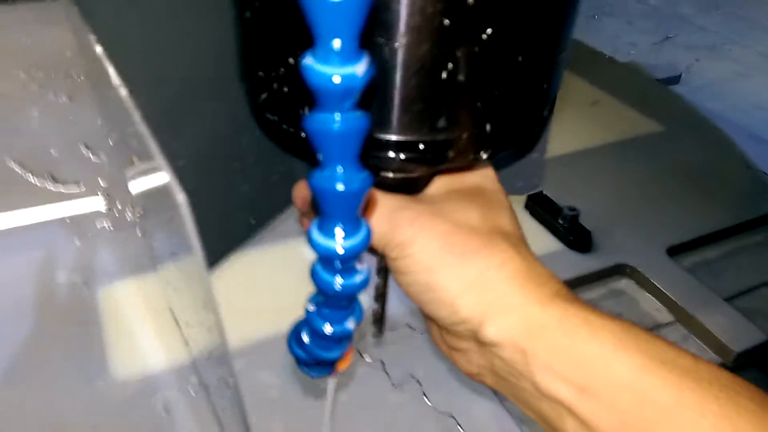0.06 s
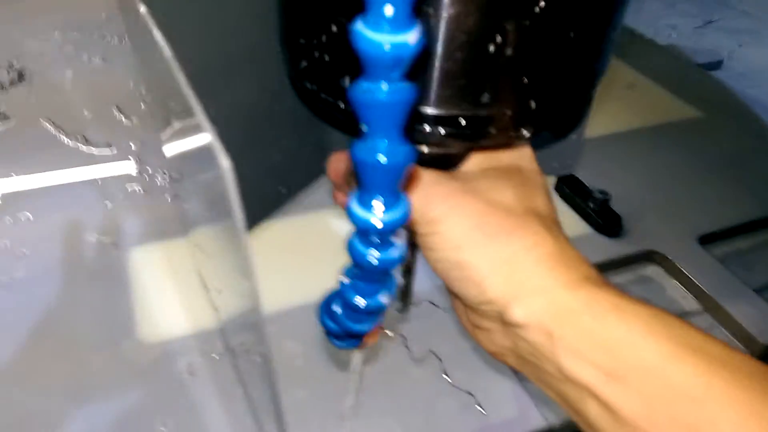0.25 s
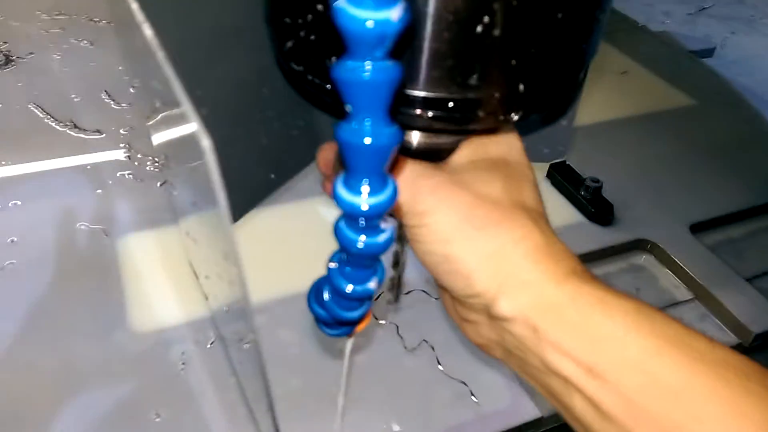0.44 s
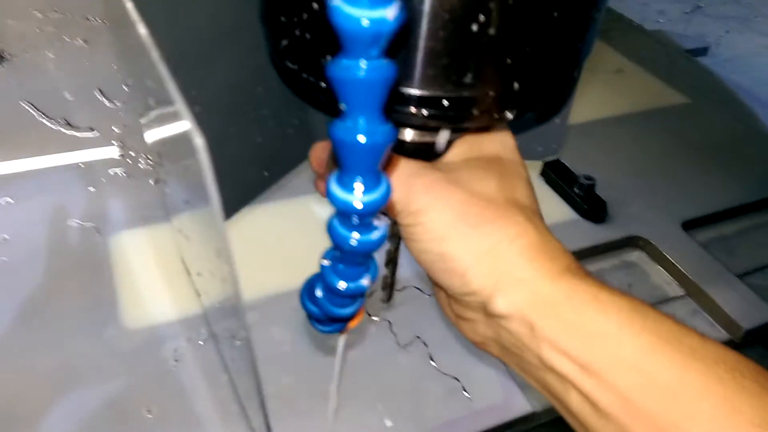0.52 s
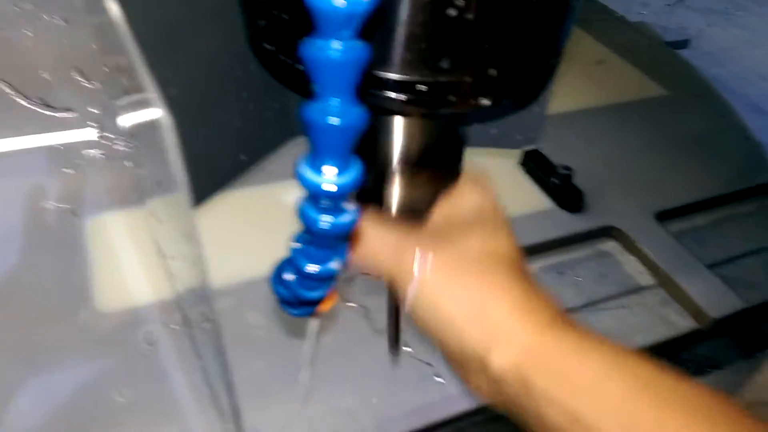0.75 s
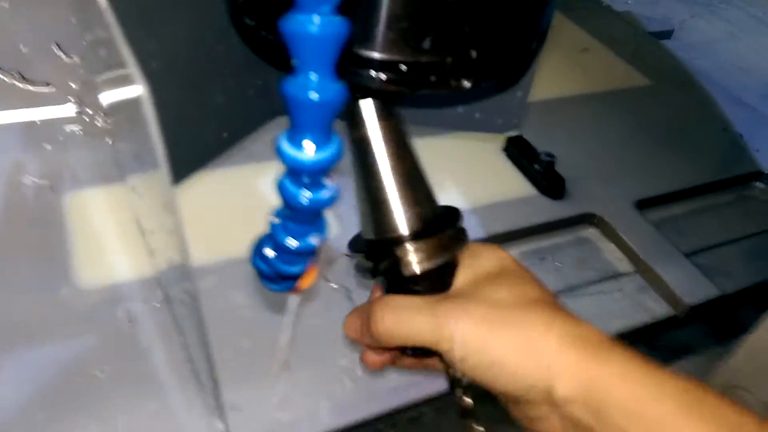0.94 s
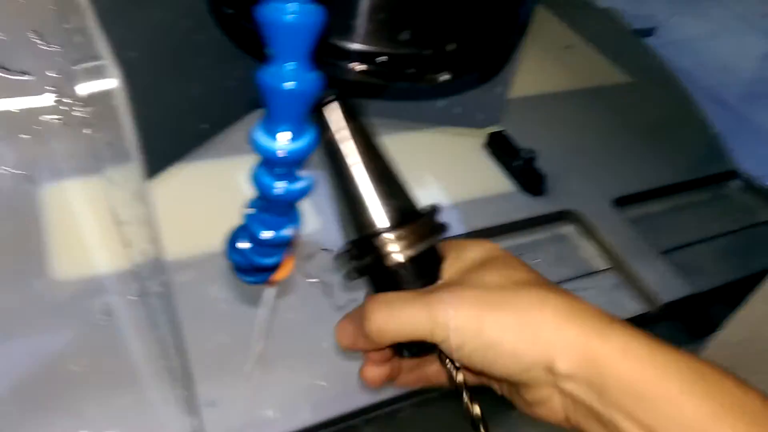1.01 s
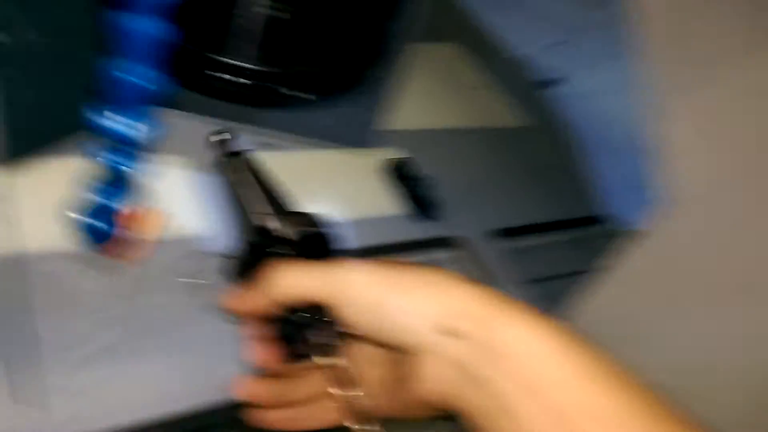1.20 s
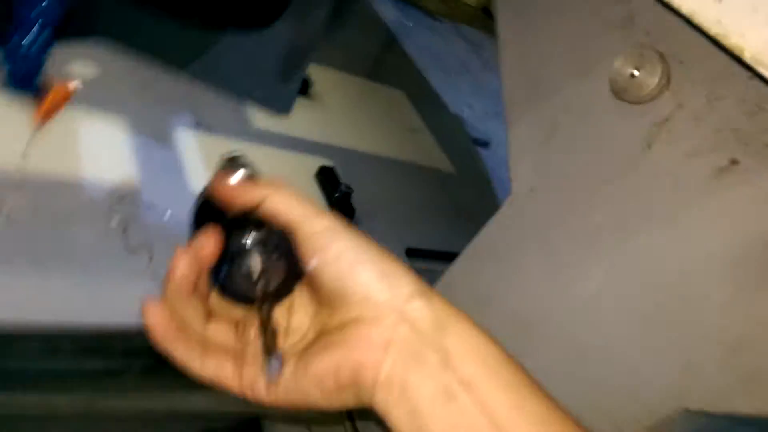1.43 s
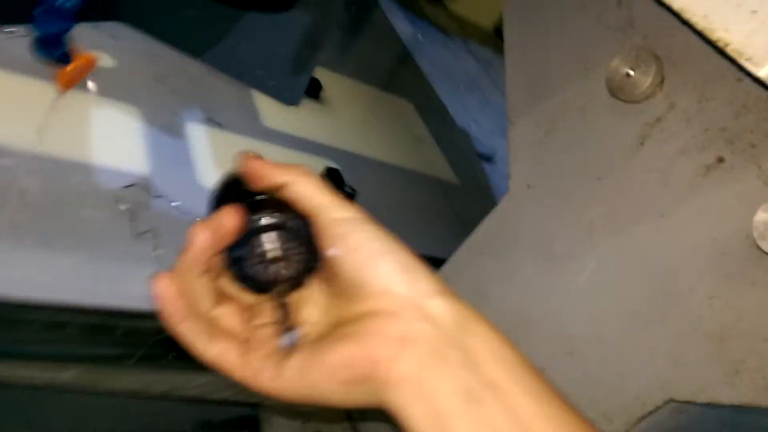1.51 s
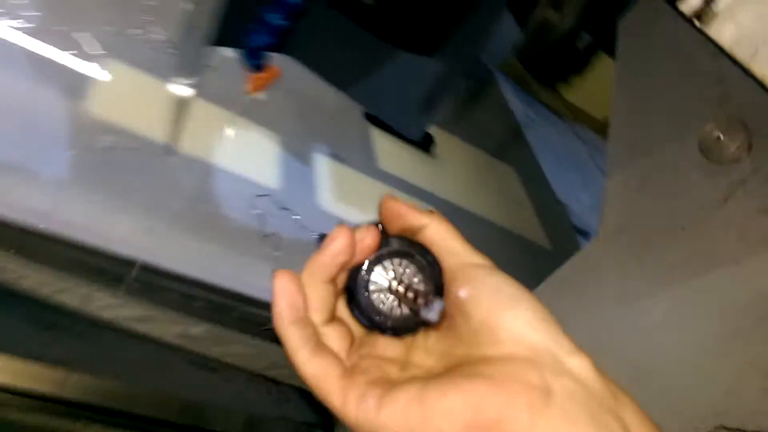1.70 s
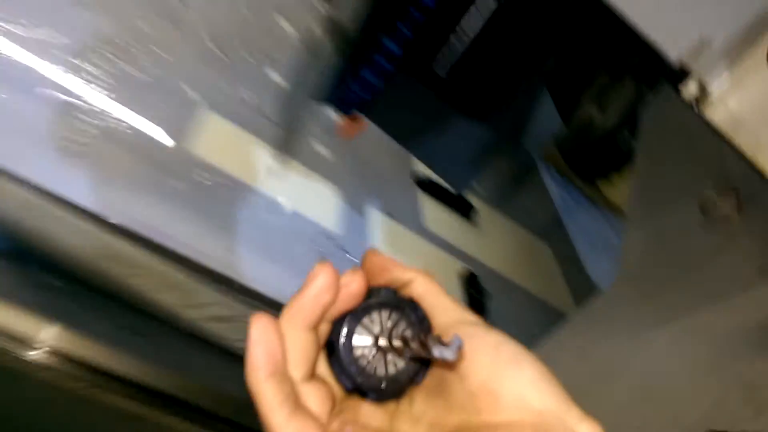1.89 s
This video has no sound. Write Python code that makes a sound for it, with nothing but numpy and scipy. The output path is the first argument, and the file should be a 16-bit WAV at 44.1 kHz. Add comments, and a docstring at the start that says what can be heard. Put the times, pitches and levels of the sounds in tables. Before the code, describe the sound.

A hiss of compressed air and metal clunks as a machine spindle releases a tool holder.

```python
"""A tool holder is released by hand from a milling spindle inside a sheet-metal enclosure.
A valve ticks, then the drawbar clunks, exciting the modes of the machine's body and panels.
Air spits and leaks past the loosening taper, then blows through the open bore, whose lowest
resonance rises as the holder is drawn out. The drawbar thumps back and the air dies away.
Last, the holder squeaks faintly in the hand while the machine hums on."""
import sys
import numpy as np
from scipy import signal
from scipy.fft import rfft, irfft
from scipy.io import wavfile

SR = 44100
rng = np.random.default_rng(int(sys.argv[2]) if len(sys.argv) > 2 else 0)


def generate_wav(signal):
    """Clip the signal to [-1, 1] and save it as 16-bit WAV at the path in sys.argv[1]."""
    frames = np.transpose(np.atleast_2d(signal))
    scaled = np.clip(frames, -1, 1) * 32767
    pcm = np.round(scaled).astype(np.int16)
    wavfile.write(sys.argv[1], SR, pcm)


N = 85995
T = np.arange(N) / SR
HZ = np.maximum(np.arange(N // 2 + 1) * SR / N, 1)
CUTOFF_HZ = 15900
AIR_PAN_DB, FLUTTER_DB, FLUTTER_HZ = 3, .8, 60
EAR_PHASE_RAD = 1.92  # phase lag of a resonance between the ears

# Air flow through the bore. Each row: time in seconds, level in dB.
FLOW = [(0.66, -43), (0.745, -38), (0.772, -31), (0.781, -16), (0.84, -16.5), (1.048, -15.5), (1.066, -22),
        (1.094, -23), (1.102, -32), (1.22, -52)]


def knocks():
    """Impact excitation: drawbar and holder give a clack of steel and set body and panels ringing."""
    # Each row: start in seconds, thud, clonk and clack levels in dB, clack cutoff in Hz,
    # favoured panel frequency in Hz.
    impacts = [(0.196, -24.5, -26, -16.5, 1570, 448), (0.262, -37, -32, -18, 2580, 2350),
               (0.268, -38, -27, -20.5, 1480, 600), (0.387, -23, -11.5, -14, 1940, 340),
               (0.448, -54, -49, -15, 2000, 1850), (0.466, -11, -16, -10, 1780, 720),
               (0.489, -32, -26, -19.5, 2840, 1500), (0.521, -30, -17, -8, 2030, 730),
               (0.539, -32, -43, -16, 3130, 756), (0.556, -27.5, -33, -17.5, 860, 716),
               (0.606, -57, -43, -16.5, 890, 870), (1.046, -8.5, -5, -11, 670, 306),
               (1.150, -27, -22.5, -14.5, 1340, 536), (1.230, -39.5, -50, -20, 2420, 1110)]
    # Low and middle modes of the body. Each row: frequency in Hz, relative level in dB, T60 in seconds.
    thud_modes = [(89.6, -3.5, 0.11), (128.1, -4.5, 0.26), (131, -1, 0.024)]
    clonk_modes = [(207, -11.5, 0.15), (298.8, 2, 0.065), (332.5, 4.5, 0.041), (313.2, -17, 0.33)]
    # Spectrum of the clack. Each row: frequency in Hz, relative level in dB.
    clack_colour = [(150, -3.5), (1300, -3), (1900, -7), (2400, 0), (6000, -8.5), (16000, -31)]
    ripple_db, bypass_db, panel_db = 2.5, -23, -8.5
    out = np.zeros((2, N))
    for start, thud_db, clonk_db, clack_db, top_hz, centre_hz in impacts:
        steel = noise(clack_colour) * burst(start, rise=.001, hold=.006, t60=.06)
        lowpass = signal.cheby1(4, ripple_db, top_hz, fs=SR, output="sos")
        clack = signal.sosfilt(lowpass, steel + 1e-18) + from_db(bypass_db) * steel
        metal = clack + from_db(panel_db) * panel_ring(start, centre_hz)
        body = from_db(thud_db) * ring(start, thud_modes) + from_db(clonk_db) * ring(start, clonk_modes)
        out += from_db(clack_db) * metal * pan(db=1.5) + body * pan(db=-4.5)
    return out


def panel_ring(start, centre_hz, db_per_octave=31.5):
    """Selective excitation: a panel mode rings less the farther it lies from the favoured frequency."""
    # Sheet-metal modes. Each row: frequency in Hz, relative level in dB, T60 in seconds.
    panel_modes = [(452.3, -4.5, 0.45), (554.4, 1.5, 0.13), (662, -4, 0.25), (878, 4, 0.05),
                   (1102, 2, 0.11), (1276, -0.5, 0.08), (1900, 2.5, 0.058), (2225, -3, 0.097),
                   (2394, 3, 0.042)]
    excited = [(hz, db - db_per_octave * abs(np.log2(hz / centre_hz)), t60)
               for hz, db, t60 in panel_modes]
    return ring(start, excited)


def bore_air():
    """Cavity resonance: a turbulent jet drives the bore, whose modes shift as the holder comes out."""
    # Lowest resonance, rising as the gap opens. Each row: time in seconds, frequency in Hz, level in dB.
    gap_tone = [(0.70, 740, -7), (0.754, 790, 6.5), (0.795, 850, -11), (0.92, 1130, -9.5)]
    # Upper resonances. Each row: frequency and width in Hz, then level in dB at each withdrawal stage.
    bore_modes = [(2146, 80, -13, -4, -3), (2630, 80, -1.5, -11, -3.5), (3730, 100, -5, -1, -1.5),
                  (6390, 350, -12, -15, -8), (10800, 650, -8, -8, -7), (12800, 330, -15, -12, -17)]
    # Withdrawal stages: the times in seconds at which the holder is just loose, half out and clear.
    stages_s = [.81, .91, 0.94]
    # Spectrum of the jet. Each row: frequency in Hz, relative level in dB.
    jet_colour = [(200, -79), (700, -7.5), (1600, -16), (2200, -2.5), (3000, 6), (4200, -2.5), (5300, -30),
                  (6200, -5), (7900, -5), (10000, 3.5), (11600, -4), (13500, -7.5), (16000, -9)]
    times, gap_hz, gap_db = np.transpose(gap_tone)
    lowest = resonance(np.interp(T, times, gap_hz), width_hz=105, ear_phase=EAR_PHASE_RAD)
    tones = from_db(np.interp(T, times, gap_db)) * lowest
    sag = np.interp(T, stages_s, [1.014, 1, .986])  # the upper resonances fall slightly
    swell_db, wander_share, wander_hz = 1.2, .008, 18  # turbulence unsettles level and pitch
    for hz, width_hz, *stage_db in bore_modes:
        db = np.interp(T, stages_s, stage_db) + swell_db * drift(wander_hz)
        centre_hz = hz * sag * (1 + wander_share * drift(wander_hz))
        tones += from_db(db) * resonance(centre_hz, width_hz, EAR_PHASE_RAD)
    air = eddies(noise(jet_colour)) * pan(AIR_PAN_DB) + tones * pan(db=6)
    return air * level(FLOW) * from_db(FLUTTER_DB * drift(FLUTTER_HZ))


def eddies(jet, count=20, depth_db=2.6, rate_hz=40):
    """Turbulence modulates the amplitude of each frequency band of the jet independently."""
    spectrum, band_index = rfft(jet), (count * HZ / CUTOFF_HZ).astype(int)
    bands = (irfft(spectrum * (band_index == k), N) for k in range(count))
    return rms_one(sum(band * from_db(depth_db * drift(rate_hz)) for band in bands))


def seal_air():
    """Jet noise from narrow gaps: valve and seal spit, and air hisses past the nearly seated taper."""
    # Strength of the leak. Each row: time in seconds, level in dB.
    leak = [(0.39, -42), (0.465, -49.5), (0.518, -17), (0.535, -31), (0.562, -29), (0.58, -17.5),
            (0.618, -32.5), (0.70, -20.5), (0.80, -26.5), (0.92, -45)]
    # Spits. Each row: start in seconds, level in dB, rise, hold and T60 in seconds, low cutoff in Hz.
    spits = [(0.1751, -19.5, 0.00083, 0.00093, 0.026, 2970), (0.4716, -5, 0.00061, 0.0035, 0.027, 4200),
             (0.576, -9, 0.0043, 0.0061, 0.026, 5400), (0.627, -10.5, 0.0042, 0.011, 0.061, 4900)]
    # Spectra of leak and spits. Each row: frequency in Hz, relative level in dB.
    leak_colour = [(400, -30), (1500, -3), (4100, 4.5), (4850, 15), (5500, 7), (11000, 13), (16000, 4)]
    spit_colour = [(5000, 0), (16000, -1.5)]
    air = level(leak) * from_db(FLUTTER_DB * drift(FLUTTER_HZ)) * noise(leak_colour)
    for start, db, rise, hold, t60, low_hz in spits:
        highpass = signal.butter(4, low_hz, "high", fs=SR, output="sos")
        hiss = signal.sosfilt(highpass, noise(spit_colour))
        air += from_db(db) * burst(start, rise, hold, t60) * hiss
    return air * pan(AIR_PAN_DB)


def wall_spray():
    """Air scattered over the walls makes broadband noise that follows the flow through the bore."""
    # Spectrum of the spray. Each row: frequency in Hz, relative level in dB.
    spray_colour = [(400, -16.5), (2500, 1), (5300, -5.5), (9000, -6), (16000, -14.5)]
    return from_db(4.5) * level(FLOW) * noise(spray_colour)


def squeaks(overtone_db=-15):
    """Stick-slip friction: the holder, turned in the hand, squeaks with two weak overtones."""
    # Each row: start in seconds, level in dB, fundamental in Hz, hold in seconds, width in Hz.
    rubs = [(1.510, -48, 2950, 0.008, 350), (1.525, -45, 3170, 0.035, 35), (1.630, -48, 2450, 0.025, 300),
            (1.823, -51, 2350, 0.012, 150)]
    out = np.zeros((2, N))
    for start, db, hz, hold, width_hz in rubs:
        envelope = burst(start, rise=.0044, hold=hold, t60=.08)
        for harmonic in (1, 2, 3):
            tone = resonance(harmonic * hz, width_hz, EAR_PHASE_RAD)
            out += from_db(db + overtone_db * (harmonic > 1)) * envelope * tone
    return out


def near_surfaces(x, count=6, echo_db=-13, longest_s=.005):
    """Interference: reflections off holder, hand and spindle nose colour each ear's sound differently."""
    gain = from_db(echo_db)
    lags = rng.uniform(.2, 1, (count, 2, 1)) * longest_s
    paths = 1 + gain * np.exp(-2j * np.pi * HZ * lags).sum(axis=0)
    return irfft(rfft(x) * paths / np.sqrt(1 + count * gain ** 2), N)


def between_walls(x, round_trip_s=.00716, echo_db=-10):
    """Comb filtering: repeated reflection between facing walls raises evenly spaced spectral peaks."""
    gain = from_db(echo_db)
    round_trip = gain * np.exp(-2j * np.pi * HZ * round_trip_s)
    return irfft(rfft(x) * np.sqrt(1 - gain ** 2) / (1 - round_trip), N)


def enclosure(x, echo_db=-8.5):
    """Reverberation: dense echoes between the sheet-metal walls decay exponentially."""
    # Spectrum of the echoes. Each row: frequency in Hz, relative level in dB.
    echo_colour = [(100, 4.5), (300, -6), (700, 0.5), (8000, 0.5), (15000, -2)]
    echoes = noise(echo_colour) * burst(0, rise=.01, hold=0, t60=.6)
    response = rms_one(echoes) / np.sqrt(N)  # unit energy
    mono = x.mean(axis=0, keepdims=True)
    return from_db(echo_db) * signal.fftconvolve(mono, response, axes=1)[:, :N]


def workshop():
    """Ambient noise: broadband rumble and hiss under the wavering, narrowband hum of idling machinery."""
    # Spectrum of the rumble and hiss. Each row: frequency in Hz, relative level in dB.
    shop_colour = [(24, -61), (40, -37), (64, -0.5), (180, -7.5), (226, -1), (372, -14), (1680, -29),
                   (3140, -21), (4240, -32.5), (16000, -34.5)]
    # Hum tones. Each row: frequency in Hz, level in dB.
    hum = [(215, -45.5), (236, -48)]
    rumble = from_db(-41.5) * noise(shop_colour)
    return rumble + sum(from_db(db) * resonance(hz, width_hz=2.3) for hz, db in hum)


def ring(start, modes):
    """Free vibration: modes struck once decay as damped sinusoids of alternating polarity."""
    age = np.maximum(T - start, 0)
    return sum((-1) ** k * from_db(db) * np.exp(-np.log(1000) * age / t60) * np.sin(2 * np.pi * hz * age)
               for k, (hz, db, t60) in enumerate(modes))


def resonance(hz, width_hz, ear_phase=0):
    """A resonance driven by noise: random amplitude and phase about a centre frequency that may move."""
    phase = 2 * np.pi * np.cumsum(hz + np.zeros(N)) / SR
    phase = np.array([phase, phase - ear_phase])
    return rms_one(drift(width_hz) * np.cos(phase) + drift(width_hz) * np.sin(phase))


def noise(colour):
    """Diffuse noise of a given spectrum: coherence between the ears falls as frequency rises."""
    # Each row: frequency in Hz, left-right correlation from 0 to 1.
    coherence = [(300, 0.87), (700, 0.27), (1500, 0.046)]
    mid, side = rfft(rng.standard_normal((2, N)))
    alike = over_hz(coherence)
    pair = np.sqrt(1 + alike) * mid + np.sqrt(1 - alike) * side * [[1], [-1]]
    return rms_one(irfft(pair * from_db(over_hz(colour)), N))


def drift(rate_hz):
    """Random fluctuation of unit power, low-passed at rate_hz."""
    return rms_one(irfft(rfft(rng.standard_normal(N)) / (1 + (HZ / rate_hz) ** 2), N))


def burst(start, rise, hold, t60):
    """Envelope: linear rise, hold, then exponential decay by 60 dB in t60 seconds."""
    age = T - start
    return np.clip(age / rise, 0, 1) * np.exp(-np.log(1000) * np.maximum(age - rise - hold, 0) / t60)


def level(curve):
    """Gain along a curve of seconds and dB, silent outside it."""
    times, db = np.transpose(curve)
    return from_db(np.interp(T, times, db, left=-np.inf, right=-np.inf))


def over_hz(points):
    """Interpolation on a logarithmic frequency axis."""
    hz, value = np.transpose(points)
    return np.interp(np.log(HZ), np.log(hz), value)


def pan(db):
    """Left and right gains for an interaural level difference."""
    return from_db([[db / 2], [-db / 2]])


def from_db(db):
    """Decibels to amplitude ratio."""
    return 10 ** (np.asarray(db) / 20)


def rms_one(x):
    """Normalisation to unit power."""
    return x / np.sqrt(np.mean(x ** 2) + 1e-20)


def scene():
    """Superposition of direct sound, echoes and workshop; the spray is heard only through its echoes."""
    near = knocks() + near_surfaces(seal_air()) + squeaks()
    blast = between_walls(near_surfaces(bore_air()))
    echoes = enclosure(near + wall_spray() + from_db(-7) * blast)
    return near + blast + echoes + workshop()


def record(dry):
    """Compression ducks loud passages, saturation rounds the peaks and filters limit the bandwidth."""
    knee_db, duck_share, attack_s, release_db_per_s = -19, .36, .017, 10
    low_cut_hz = 84
    pole = np.exp(-1 / (attack_s * SR))
    power = signal.lfilter([1 - pole], [1, -pole], np.mean(dry ** 2, axis=0))
    over_db = np.maximum(10 * np.log10(power + 1e-12) - knee_db, 0)
    release_db = release_db_per_s * T
    duck_db = np.maximum.accumulate(duck_share * over_db + release_db) - release_db
    highpass = signal.butter(2, low_cut_hz, "high", fs=SR, output="sos")
    lowpass = signal.ellip(12, .2, 100, CUTOFF_HZ, fs=SR, output="sos")
    ducked = signal.sosfilt(highpass, dry) * from_db(-duck_db)
    rounded = ducked / (1 + ducked ** 4) ** .25
    return signal.sosfilt(lowpass, rounded)


dry = scene()
out = record(dry)
generate_wav(out)
```